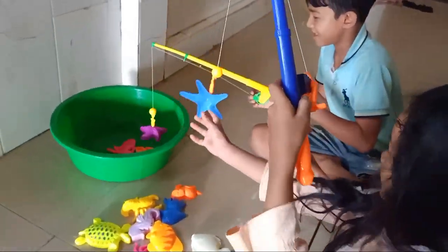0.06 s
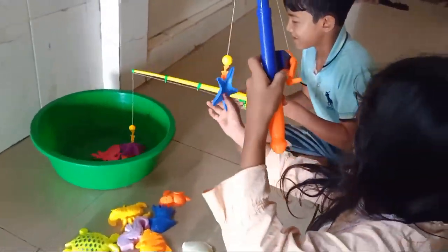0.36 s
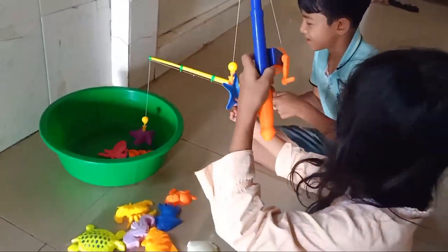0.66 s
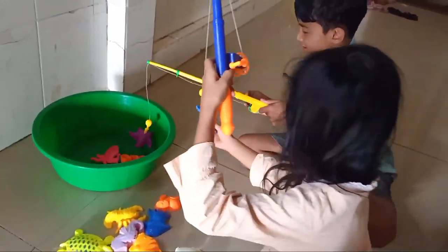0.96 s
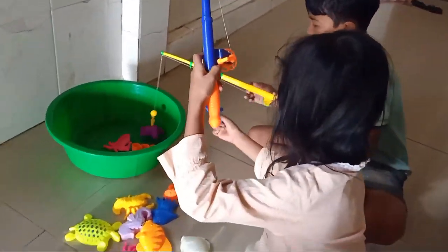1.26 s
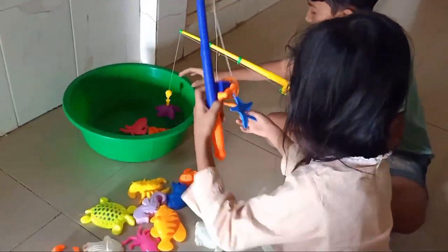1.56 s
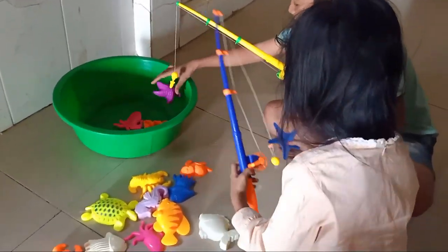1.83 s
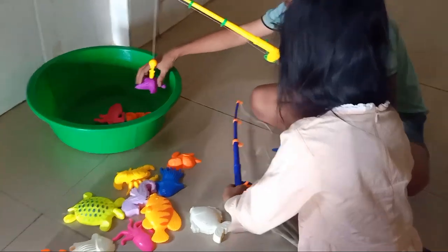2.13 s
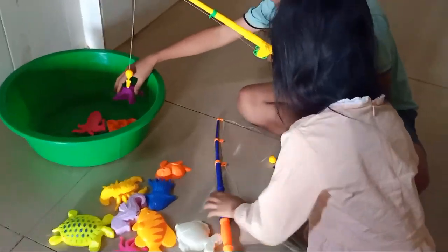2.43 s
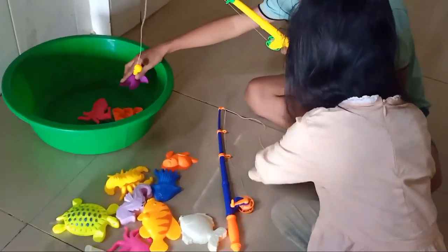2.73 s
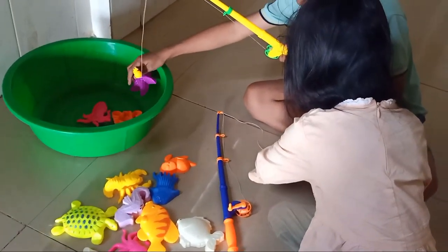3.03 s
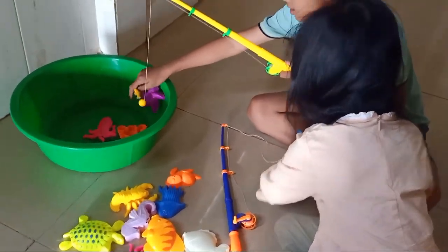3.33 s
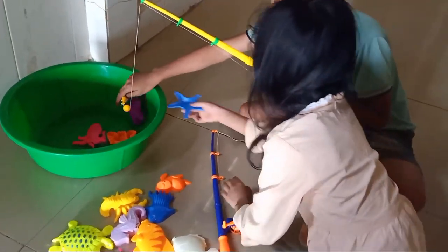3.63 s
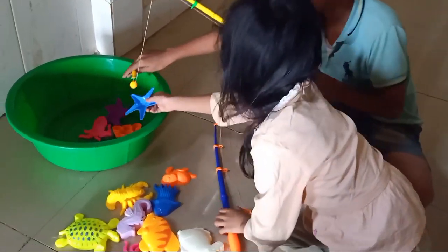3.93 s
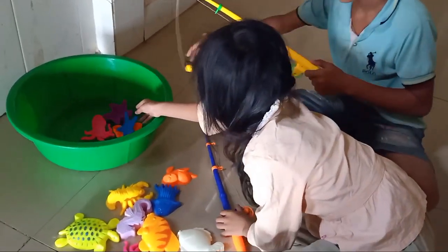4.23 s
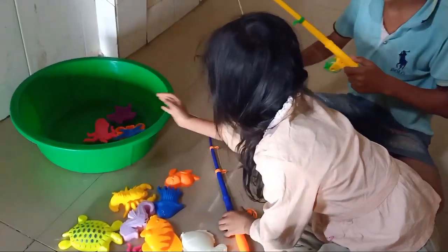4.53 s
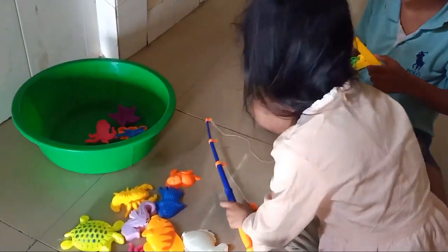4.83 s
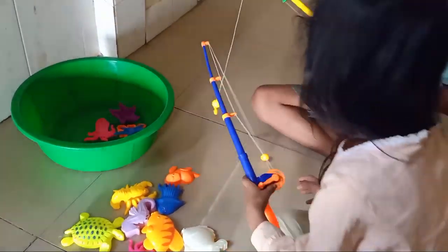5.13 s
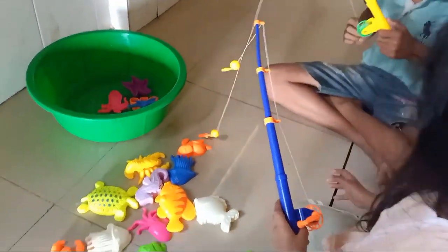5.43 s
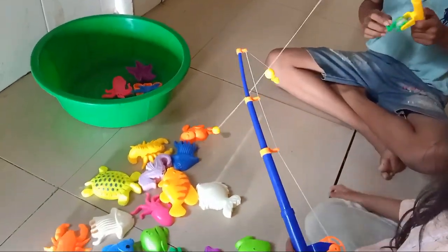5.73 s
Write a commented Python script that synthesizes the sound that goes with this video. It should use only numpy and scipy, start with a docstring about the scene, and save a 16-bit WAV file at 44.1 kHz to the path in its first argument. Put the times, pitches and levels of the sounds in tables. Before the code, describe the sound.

In a bare tiled room, plastic fishing toys are handled close to the microphone. Scattered knocks and reel clicks, with faint rubbing, lead to a short clatter as a toy rod lands on the floor. The busiest part follows, with hollow toy animals dropping and bouncing in a plastic basin. Dull, quiet bumps and a small bouncing hook finish it, each contact leaving a short echo over faint air.

```python
'''Hollow plastic toys knock and tumble in a plastic basin: a game of toy fishing in a bare tiled room.
A reel clicks and rubs, a rod clatters onto the floor with a thin squeak, and its hook taps the toys.
Each contact is a crack of a few milliseconds that rings a plastic body: an edge gives a bright snap,
a flat side or a fingertip a duller knock. The basin wall hums on after its hits, hands and knees bump
the floor, and the wash of the hard room follows every sound over a faint bed of air.'''
import sys
import numpy as np
from scipy import signal
from scipy.fft import rfft, irfft, next_fast_len
from scipy.io import wavfile
from scipy.ndimage import uniform_filter1d

SR = 44100
rng = np.random.default_rng(int(sys.argv[2]) if len(sys.argv) > 2 else 0)


def output_pcm(signal):
    """Save a mono or channel-first signal as 16-bit PCM at the path in sys.argv[1].

    Samples are clipped to [-1, 1] before scaling.
    """
    pcm = np.clip(np.atleast_2d(signal).T, -1, 1) * 32767
    wavfile.write(sys.argv[1], SR, np.round(pcm).astype(np.int16))


N = 263497

# tone of the air bed: frequency_hz, relative_db
AIR_SPECTRUM = [(18, -62), (30, -20), (53, -19.5), (114, -9.5), (177, -18), (243, -18), (350, -21),
                (897, -21), (1470, -23), (2180, -19), (3490, -29.5), (5450, -28), (6890, -37.5),
                (8950, -43), (15500, -40)]
# stereo image of the air and the reverb: frequency_hz, left_right_correlation
STEREO_LIKENESS = [(60, 0.83), (290, 0.82), (640, 0.5), (1400, -0.15), (3100, 0.12), (15000, -0.2)]
# decay of the tiled room: frequency_hz, t60_s
ROOM_DECAY = [(150, 0.58), (400, 0.8), (1040, 0.74), (2760, 0.65), (5500, 0.54), (8000, 0.54),
              (14000, 0.41)]
# tone of the reverb: frequency_hz, gain_db
ROOM_COLOUR = [(150, -3.5), (400, 2.5), (1000, -5), (2300, -4.5), (5500, -2.5), (9000, -4.5), (14000, 2.5)]
# hands and knees on the floor: start_s, level_db
FLOOR_BUMPS = [(4.805, -52), (4.89, -72), (5.201, -52.5), (5.475, -53)]
# plastic rubbing on plastic: start_s, length_s, pitch_hz, hum_db, rasp_db
RUB_STROKES = [(0.784, 0.12, 2100, -57.5, -74), (1.002, 0.067, 2140, -55.5, -74),
               (1.772, 0.11, 2190, -63, -66.5), (2, 0.045, 1850, -62, -85), (2.325, 0.059, 2230, -58, -56),
               (2.482, 0.15, 2100, -46, -60.5), (3.549, 0.18, 2510, -60, -67), (4.47, 0.13, 2550, -57, -66),
               (4.955, 0.047, 2480, -57, -92), (5.646, 0.26, 2150, -68, -84)]
# slow ring of the basin wall: pitch_hz, gain_db, t60_s
BASIN_WALL_MODES = [(181, -20, 0.28), (336.4, -15.5, 0.33), (389.5, -9, 0.22), (421.3, -12.5, 0.46),
                    (489.6, -13.5, 0.42)]

# cue lists: start_s, strength_db, hardness_db
HOOK_TAPS = [(5.476, -62, 1), (5.583, -34, 1.5), (5.626, -40, -1), (5.778, -52, -5), (5.803, -50, -2.5),
             (5.83, -53, -2), (5.857, -41.5, 2), (5.884, -47, 0)]   # the hook tapping and bouncing
ROD_HITS = [(2.463, -41, 5), (2.475, -28.5, -4.5), (2.4865, -30.5, -1), (2.4995, -34, 0.5),
            (2.595, -31.5, -4), (2.603, -34, 1.5), (2.618, -46.5, 8.5)]   # the rod clattering onto the tiles
REEL_CLICKS = [(1.084, -58, 1), (1.772, -50, -4.5), (2.018, -59, -12), (2.088, -38.5, 6), (2.105, -57, 2),
               (2.238, -44.5, 2), (2.256, -55.5, 14), (2.34, -43.5, 0), (2.367, -41, 2), (2.399, -45, 1),
               (2.675, -49.5, -1), (2.688, -41, -1), (2.82, -54, -5.5), (2.837, -51, -2),
               (3.349, -55.5, -6), (3.674, -52.5, 3), (4.966, -45.5, -4.5), (5.133, -55, -6),
               (5.281, -58.5, -7.5)]   # the reel and its crank
STARFISH_HITS = [(.427, -29.5, -2.5), (4.026, -38.5, 6), (4.437, -30, 1), (4.498, -29.5, -3),
                 (4.589, -32, 3.5), (4.807, -46.5, -0.5)]   # a stiff starfish bouncing on its arms
CATCH_HITS = [(.442, -27.5, 3.5), (.456, -32, -1.5), (.991, -54, 2), (1.102, -53, -2.5),
              (1.161, -32.5, -2.5), (1.418, -43.5, -4.5), (1.503, -40, 0)]   # a hooked toy swinging against the basin
# loose toys dropped into the basin, with a dull wall echo just after the loud hit at 3.69 s
TUMBLE_HITS = [(3.381, -29.5, 2), (3.692, -23.5, 1.5), (3.72, -42.5, -11), (3.757, -36, 0), (3.825, -47, 9),
               (3.854, -29, 1), (3.888, -33, -1.5), (3.904, -40, -4.5), (3.958, -44, 4.5),
               (3.986, -40.5, 0.5), (4.063, -40.5, -3.5), (4.089, -33, 0), (4.337, -23.5, -0.5),
               (4.348, -38.5, -4.5), (4.366, -36, -1.5), (4.405, -32.5, 3), (4.418, -32.5, 7.5),
               (4.426, -28.5, 2.5), (4.45, -32.5, 0), (4.578, -38, -1), (4.614, -46.5, -1),
               (4.801, -49.5, -5.5), (4.891, -50, -4)]

# body resonances of each prop: pitch_hz, width_hz, gain_db
HOOK_MODES = [(684, 420, -10), (986, 110, 13.5), (1400, 170, -1), (1650, 320, -2.5), (2300, 170, -1),
              (2670, 170, -0.5), (4920, 1160, 2), (5830, 910, 2), (13400, 1600, -15.5)]
ROD_MODES = [(705, 91, -14), (1076, 99, -1), (1962, 210, 8.5), (2277, 320, 10), (2670, 230, 5),
             (3340, 440, -6), (5550, 650, -7), (12900, 1800, -21.5)]
REEL_MODES = [(960, 140, -24), (1950, 295, -0.5), (2420, 540, 1.5), (3910, 1000, 0.5), (5110, 500, 11),
              (5880, 1090, 5.5), (11300, 240, -4.5), (13200, 2900, -8)]
STARFISH_MODES = [(400, 54, -14), (1060, 130, -10), (1880, 370, -16), (2520, 240, 0.5), (2830, 350, -4),
                  (3750, 530, -4.5), (5450, 600, -2.5), (12500, 3000, -22)]
CATCH_MODES = [(323, 280, -5), (477, 116, 0.5), (713, 190, -5.5), (1040, 170, 1.5), (1410, 230, -4),
               (1840, 276, 4.5), (2566, 870, -4.5), (3670, 510, -7), (5440, 760, -8), (12700, 1400, -22.5)]
TUMBLE_MODES = [(176, 190, -8.5), (394, 68, 2), (695, 100, -10), (902, 140, 3.5), (1064, 500, 1.5),
                (1500, 380, 2), (1907, 243, 7.5), (2360, 377, 7.5), (2653, 492, 4.5), (3875, 660, -6),
                (5360, 554, -0.5), (13900, 1200, -13.5)]

# the four registers of a hit (thump, knock, clack, snap): low_hz, high_hz
REGISTERS = [(150, 650), (650, 1500), (1500, 3000), (3600, 16500)]
# a harder hit trades thump for snap; one value a register: gain_db_per_hardness_db
HARDNESS_TILT = [-1.13, -1.05, 0.13, 1.19]
# balance of each prop under an ordinary blow: thump_db, knock_db, clack_db, snap_db
HOOK_VOICE = [-12.5, -1, -1.5, -4.5]
ROD_VOICE = [-21.5, -10, 0, -10]
REEL_VOICE = [-25.5, -13.5, 0, -1.5]
STARFISH_VOICE = [-25, -10, -0.5, -10]
CATCH_VOICE = [-21.5, -5.5, -1, -8]
TUMBLE_VOICE = [-18.5, -5, -1, -10.5]


def from_db(db):
    """Decibels to gain."""
    return 10 ** (np.asarray(db) / 20)


def unit_rms(x):
    """Scale to unit power."""
    return x / np.sqrt(np.mean(x ** 2) + 1e-20)


def at_hz(points, hz):
    """Read a curve on a log-frequency axis."""
    points_hz, values = np.transpose(points)
    return np.interp(np.log(hz + 1e-9), np.log(points_hz), values)


def band(x, low_hz, high_hz, order=3):
    """Causal band-pass."""
    sos = signal.butter(order, [low_hz, high_hz], "band", fs=SR, output="sos")
    return signal.sosfilt(sos, x + 1e-18)


def resonate(x, hz, width_hz):
    """One resonance, with unity gain at its peak."""
    radius = np.exp(-np.pi * width_hz / SR)
    feedback = [1, -2 * radius * np.cos(2 * np.pi * hz / SR), radius ** 2]
    return signal.lfilter(np.array([1, 0, -1]) * (1 - radius ** 2) / 2, feedback, x + 1e-18)


def add(track, start_s, sound):
    """Mix a short sound into a track."""
    i = max(round(start_s * SR), 0)
    track[..., i:i + sound.shape[-1]] += sound[..., :max(N - i, 0)]


def envelope(start_s, length_s, attack_s, release_s):
    """Rise, hold until the length is up, then die away."""
    t = np.arange(N) / SR - start_s
    return np.clip(t / attack_s, 0, 1) * np.exp(-np.clip((t - length_s) / release_s, 0, 20))


def diffuse_spectrum(size):
    """Frequencies and spectrum of stereo noise from all sides: centred bass, wide treble."""
    hz = np.arange(size // 2 + 1) * SR / size
    mid, side = rfft(rng.standard_normal((2, size)))
    likeness = np.clip(at_hz(STEREO_LIKENESS, hz), -1, 1)
    return hz, (np.sqrt(1 + likeness) * mid + np.sqrt(1 - likeness) * side * [[1], [-1]]) / np.sqrt(2)


def room_tone(level_db=-69.5):
    """A faint, steady bed of air with no deep bass."""
    hz, spectrum = diffuse_spectrum(next_fast_len(N + N % 2, True))
    air = irfft(spectrum * from_db(at_hz(AIR_SPECTRUM, hz)))[:, :N]
    return from_db(level_db) * unit_rms(band(air, 38, 15000))


def tiled_room(send, size=2 ** 15, lumps_db=1.5):
    """Wall echoes swell within 30 ms and merge into a tail that dies band by band."""
    t = np.arange(size) / SR
    hz, spectrum = diffuse_spectrum(size)
    spectrum = spectrum * from_db(at_hz(ROOM_COLOUR, hz))
    centres_hz, decays_s = np.transpose(ROOM_DECAY)
    tail = 0
    for solo, t60_s in zip(np.eye(len(centres_hz)), decays_s):
        crossover = at_hz(np.c_[centres_hz, solo], hz)
        tail = tail + irfft(spectrum * crossover) * from_db(-60 * t / t60_s)
    # only the floor answers at first; the near walls arrive together at about 28 ms
    swell = from_db(np.interp(t, [0, .004, .013, .018, .028, .04], [-40, -2, -2, 0, 4.5, 0]))
    # single echoes stand out early on
    lumps = unit_rms(uniform_filter1d(rng.standard_normal(size), 64))
    tail = tail * swell * from_db(lumps_db * lumps * np.exp(-t / 0.14))
    return signal.fftconvolve(send[None], tail / np.sqrt(0.034 * SR), axes=1)[:, :N]


def floor_bumps(decay_s=0.0078):
    """Hands and knees land softly, each with a dull, hollow thud."""
    t, out = np.arange(SR // 5) / SR, np.zeros(N)
    for start_s, level_db in FLOOR_BUMPS:
        thud = unit_rms(resonate(rng.standard_normal(len(t)), hz=390, width_hz=110))
        add(out, start_s, from_db(level_db) * np.exp(-t / decay_s) * thud)
    return out


def rod_squeak(pitch_hz=8680, width_hz=330, gain_db=-56.5):
    """As the rod is let go, friction sings briefly in one high, narrow resonance."""
    friction = resonate(rng.standard_normal(N), pitch_hz, width_hz)
    tone = unit_rms(resonate(friction, pitch_hz, 2 * width_hz))
    swell = envelope(start_s=2.688, length_s=0.025, attack_s=0.025, release_s=0.039)
    return from_db(gain_db) * swell * tone


def rubbing(slips_per_s=700, uneven_db=3.0, rasp_hz=5500, grip_db=2, grip_s=0.025):
    """Tiny stick-slips ring the reel housing and the hollow shaft, whose pitch follows the spot rubbed."""
    slipping = rng.random(N) < slips_per_s / SR
    slip_sizes = from_db(uneven_db * np.minimum(rng.exponential(1, N), 4))
    slips = slipping * slip_sizes * rng.choice([-1, 1], N)
    housing = from_db(-12) * unit_rms(resonate(slips, hz=880, width_hz=160))
    rasp = unit_rms(resonate(resonate(slips, rasp_hz, 1300), rasp_hz, 2600))
    # the pressure of a hand is never even
    grip = from_db(grip_db * unit_rms(uniform_filter1d(rng.standard_normal(N), int(grip_s * SR))))
    out = np.zeros(N)
    for start_s, length_s, pitch_hz, hum_db, rasp_db in RUB_STROKES:
        shaft = unit_rms(resonate(resonate(slips, pitch_hz, 300), pitch_hz, 500))
        stroke = envelope(start_s, length_s, attack_s=0.039, release_s=0.064)
        out += stroke * (from_db(hum_db) * (shaft + housing) + from_db(rasp_db) * rasp)
    return grip * out


def basin_ring():
    """The thin wall hums on after each blow, as strongly as the blow thumped."""
    t, out = np.arange(SR // 2) / SR, np.zeros(N)
    for hits, voice in (CATCH_HITS, CATCH_VOICE), (TUMBLE_HITS, TUMBLE_VOICE):
        for start_s, strength_db, hardness_db in hits:
            thump_db = strength_db + voice[0] + HARDNESS_TILT[0] * hardness_db
            signs = rng.choice([-1, 1], len(BASIN_WALL_MODES))
            for sign, (pitch_hz, gain_db, t60_s) in zip(signs, BASIN_WALL_MODES):
                decay = from_db(thump_db + gain_db - 60 * t / t60_s)
                add(out, start_s, sign * decay * np.sin(2 * np.pi * pitch_hz * t))
    return out


def plastic_hits(hits, modes, voice, send_db, chatter_s, slap_s, slap_db,
                 left_lag_s, spread, lowpass_hz, crack_db):
    """Hard contacts ring one hollow prop; returns the stereo direct sound and the reverb send."""
    starts_s, strength_db, hardness_db = np.transpose(hits)
    t = np.arange(1536) / SR
    # surfaces chatter for a moment as they meet; the tiles slap a first reflection straight back
    slap = from_db(slap_db) * (t > slap_s) * np.exp(-np.abs(t - slap_s) / chatter_s)
    push = np.exp(-t / chatter_s) + slap
    chatter = push * rng.standard_normal((len(hits), 3, len(t)))   # hit, left/right/send, sample
    # left and right share the bass, and each gets treble of its own
    force = chatter[:, 2:] + spread * band(chatter, 900, 16000, order=2)
    # the room gathers sound from all directions, which evens out to one clean click
    force[:, 2] = t == 0
    # every point of contact favours slightly different modes
    favour = from_db(1.5 * rng.standard_normal((len(hits), len(modes))))
    body = from_db(crack_db) * force
    for k, (pitch_hz, width_hz, gain_db) in enumerate(modes):
        mode_gain = (-1) ** k * from_db(gain_db) * favour[:, k, None, None]
        body = body + mode_gain * resonate(force, pitch_hz, width_hz)
    # plastic yields a little, which dulls the very top
    body = signal.sosfilt(signal.butter(2, lowpass_hz, fs=SR, output="sos"), body)
    # the strength and hardness of a blow set its level in each register
    blows = 0
    for (low_hz, high_hz), voice_db, tilt in zip(REGISTERS, voice, HARDNESS_TILT):
        register = band(body, low_hz, high_hz, order=4)
        power = np.sum(register ** 2, axis=2, keepdims=True) / (.007 * SR)   # as if it lasted 7 ms
        gain = from_db(strength_db + voice_db + tilt * hardness_db)
        blows = blows + register / np.sqrt(power) * gain[:, None, None]
    direct, send = np.zeros((2, N)), np.zeros(N)
    for start_s, (left, right, to_room) in zip(starts_s, blows):
        late_left = np.interp(t - left_lag_s, t, left, left=0)
        add(direct, start_s, np.array([late_left, right]))
        add(send, start_s, to_room * from_db(send_db))
    return direct, send


def scene():
    """Six plastic props, the handling noise and the basin's hum, all in one tiled room."""
    catch = plastic_hits(
        CATCH_HITS, CATCH_MODES, CATCH_VOICE, send_db=1.0, chatter_s=0.0016, slap_s=0.0029,
        slap_db=-6.5, left_lag_s=0.0002, spread=1.0, lowpass_hz=5860, crack_db=-43)
    tumble = plastic_hits(
        TUMBLE_HITS, TUMBLE_MODES, TUMBLE_VOICE, send_db=0.27, chatter_s=0.0013, slap_s=0.004,
        slap_db=-7.5, left_lag_s=0.00019, spread=1.0, lowpass_hz=5640, crack_db=-31.5)
    starfish = plastic_hits(
        STARFISH_HITS, STARFISH_MODES, STARFISH_VOICE, send_db=-2.0, chatter_s=0.0011, slap_s=0.0027,
        slap_db=-4.5, left_lag_s=0.0004, spread=0.68, lowpass_hz=6000, crack_db=-26.5)
    reel = plastic_hits(
        REEL_CLICKS, REEL_MODES, REEL_VOICE, send_db=0.5, chatter_s=0.0012, slap_s=0.0032,
        slap_db=-7.5, left_lag_s=0.00008, spread=6.1, lowpass_hz=8900, crack_db=-26.5)
    rod = plastic_hits(
        ROD_HITS, ROD_MODES, ROD_VOICE, send_db=-1.3, chatter_s=0.0033, slap_s=0.0014,
        slap_db=-12.0, left_lag_s=0.00003, spread=0.37, lowpass_hz=7500, crack_db=-42)
    hook = plastic_hits(
        HOOK_TAPS, HOOK_MODES, HOOK_VOICE, send_db=1.8, chatter_s=0.0032, slap_s=0.0019,
        slap_db=-7.0, left_lag_s=0.00001, spread=0.72, lowpass_hz=6950, crack_db=-30.5)
    direct, send = (sum(bus) for bus in zip(catch, tumble, starfish, reel, rod, hook))
    handling = rubbing() + rod_squeak() + floor_bumps()
    ring = basin_ring()
    wash = tiled_room(send + from_db(-2.0) * handling + ring)
    return direct + from_db(-6.5) * handling + from_db(1.5) * ring + wash + room_tone()


def record(dry, left_dip_db=-7.0, right_dip_db=-2.0, cutoff_hz=15700):
    """Master EQ: a presence dip, deeper on the left, and a steep cut of the very top."""
    presence = resonate(dry, hz=5000, width_hz=2200)
    dipped = dry + (from_db([[left_dip_db], [right_dip_db]]) - 1) * presence
    return signal.sosfilt(signal.ellip(10, .1, 70, cutoff_hz, fs=SR, output="sos"), dipped)


dry = scene()
out = record(dry)
output_pcm(out)
```